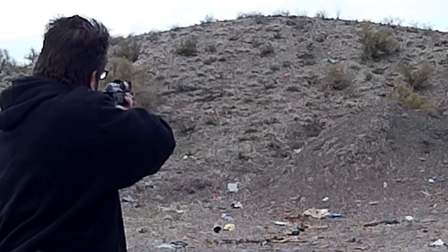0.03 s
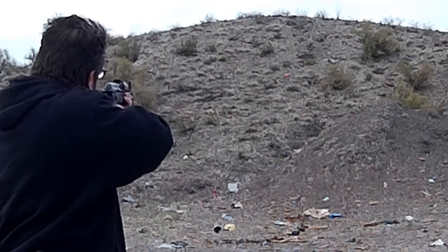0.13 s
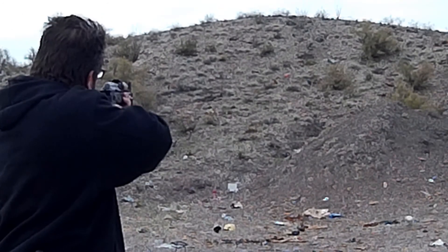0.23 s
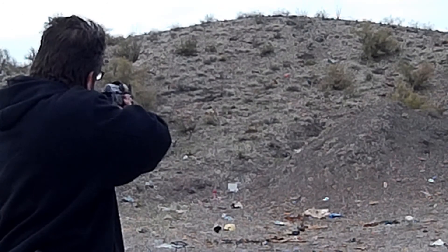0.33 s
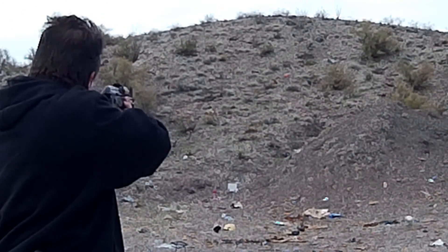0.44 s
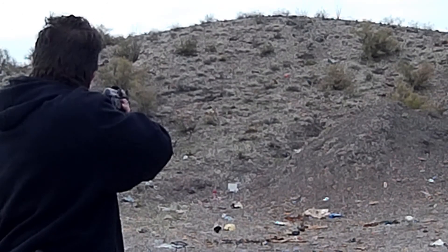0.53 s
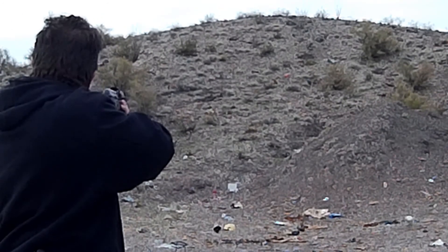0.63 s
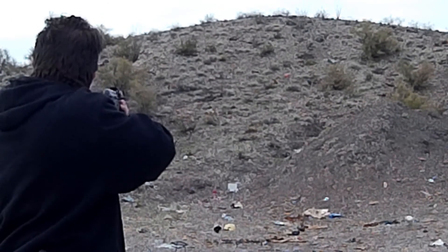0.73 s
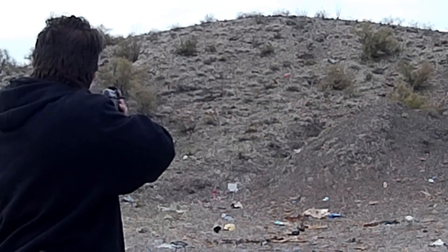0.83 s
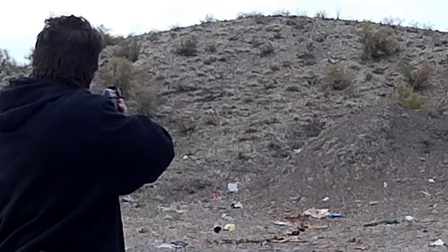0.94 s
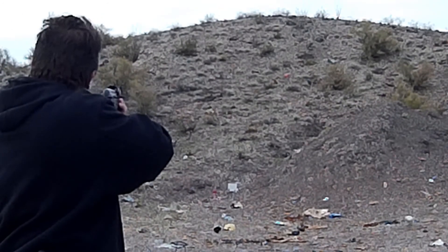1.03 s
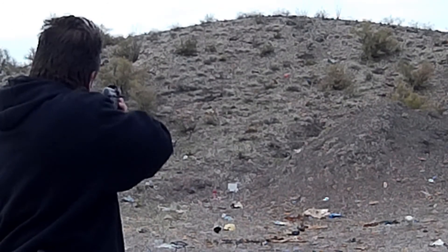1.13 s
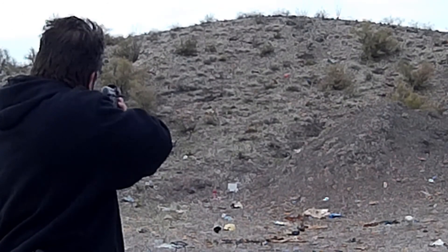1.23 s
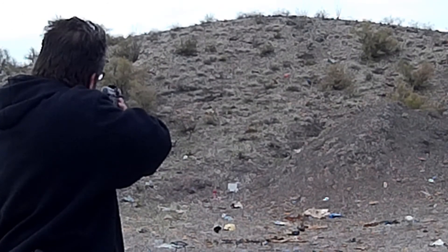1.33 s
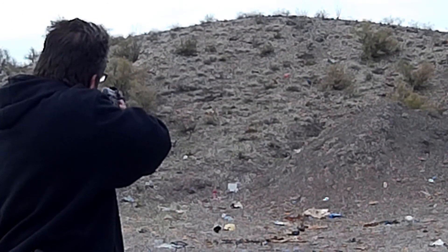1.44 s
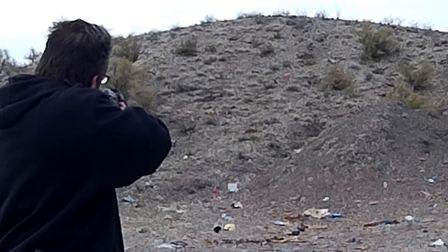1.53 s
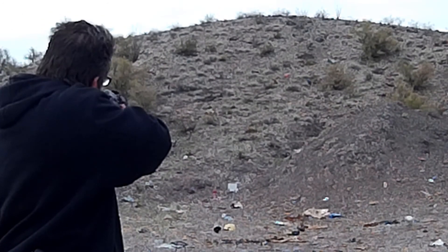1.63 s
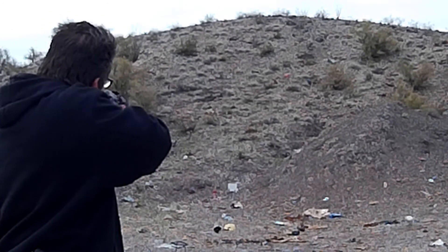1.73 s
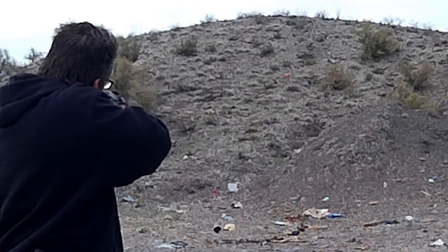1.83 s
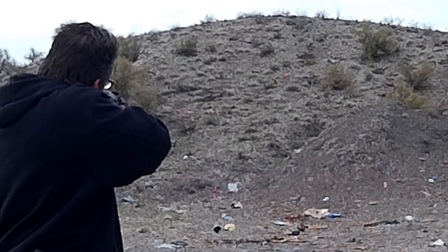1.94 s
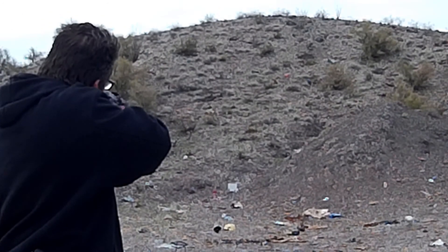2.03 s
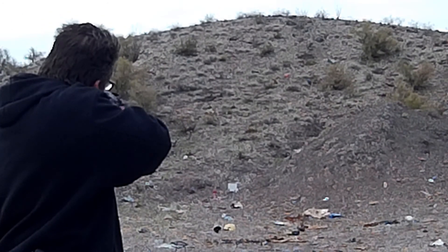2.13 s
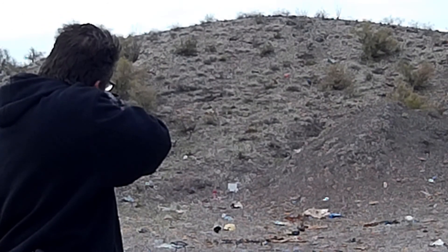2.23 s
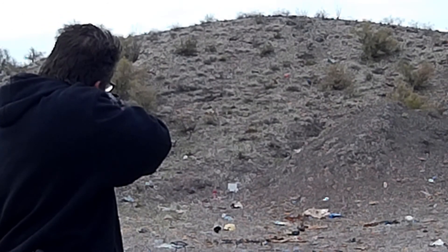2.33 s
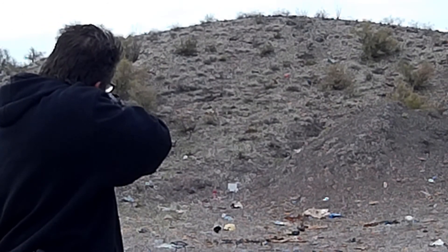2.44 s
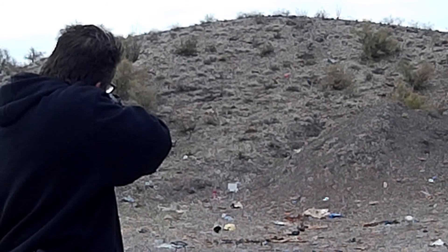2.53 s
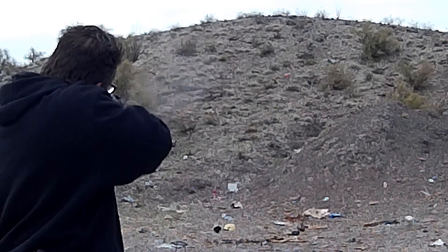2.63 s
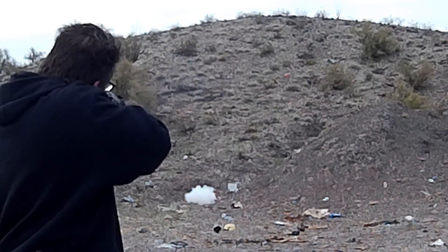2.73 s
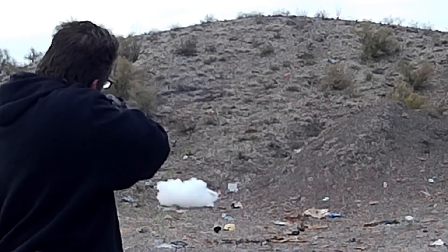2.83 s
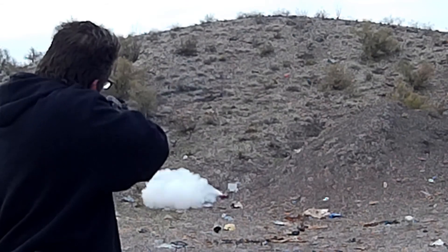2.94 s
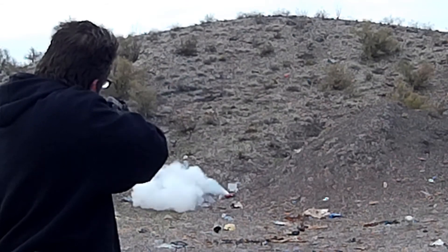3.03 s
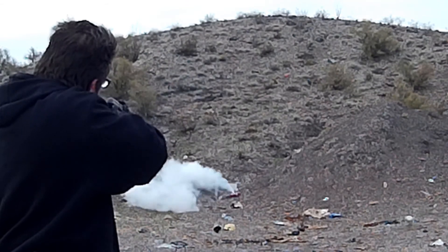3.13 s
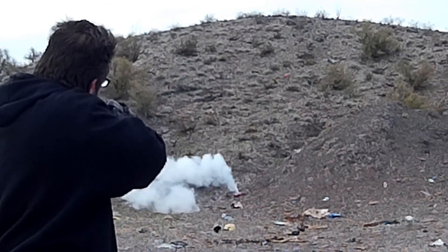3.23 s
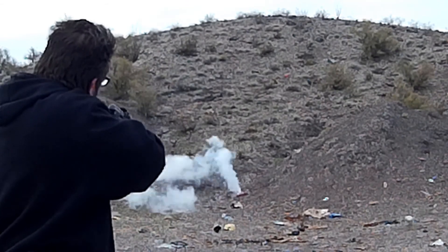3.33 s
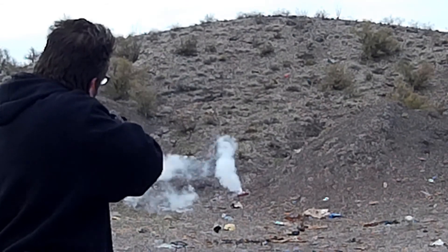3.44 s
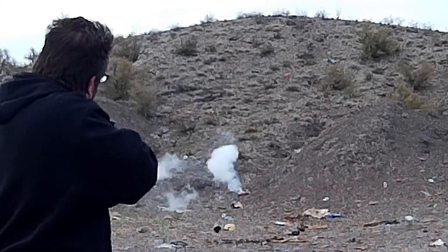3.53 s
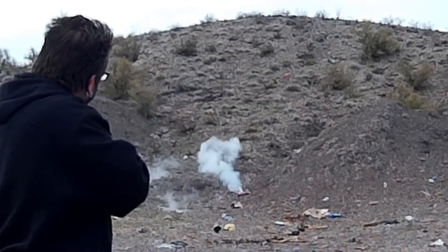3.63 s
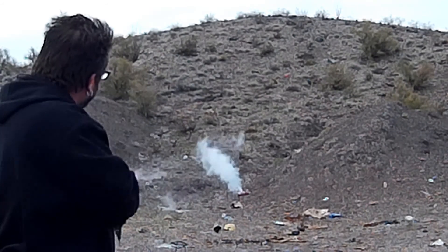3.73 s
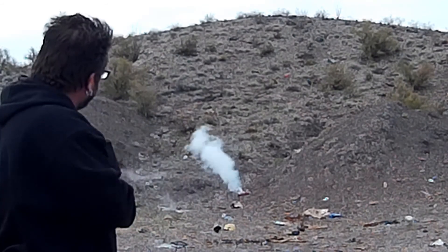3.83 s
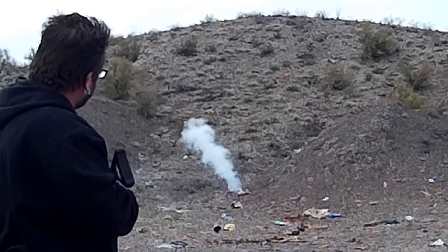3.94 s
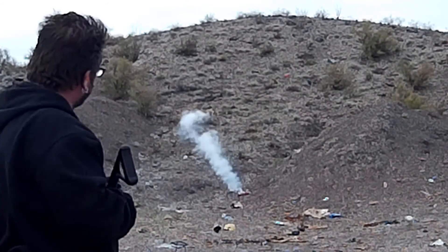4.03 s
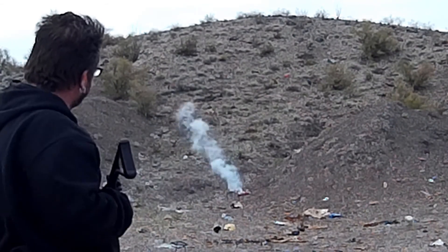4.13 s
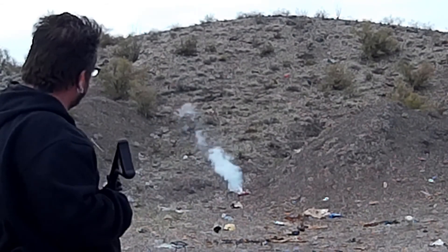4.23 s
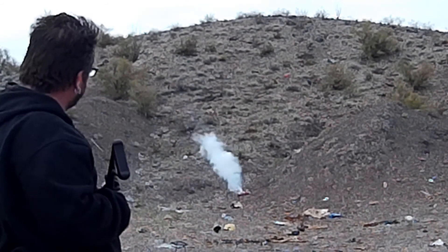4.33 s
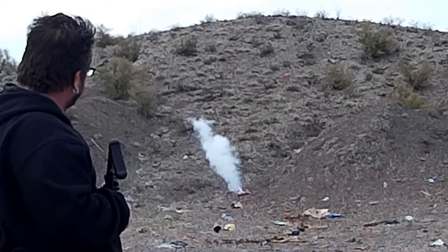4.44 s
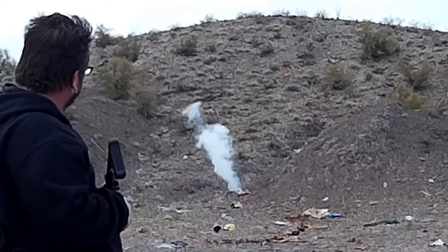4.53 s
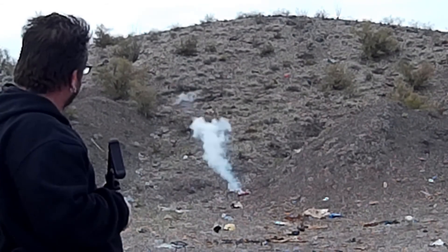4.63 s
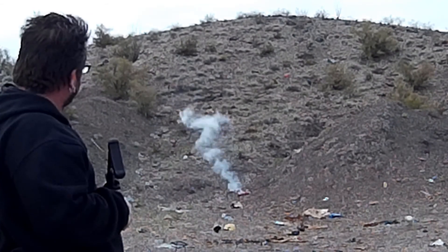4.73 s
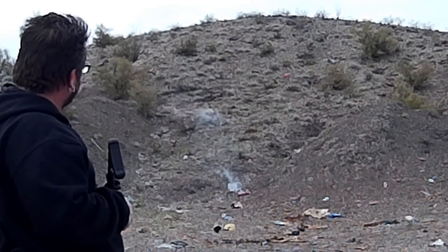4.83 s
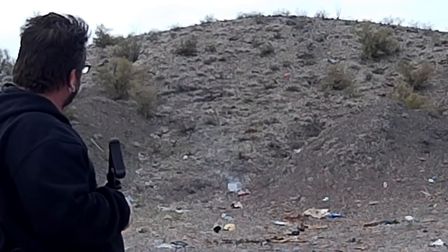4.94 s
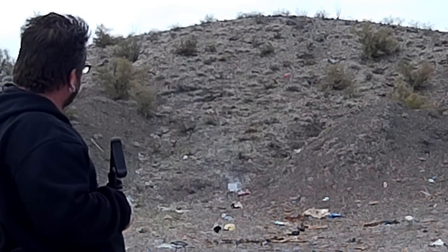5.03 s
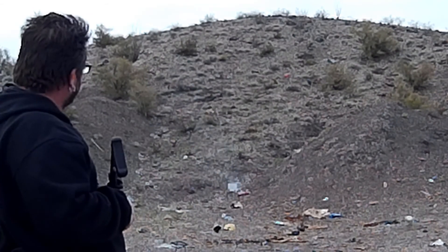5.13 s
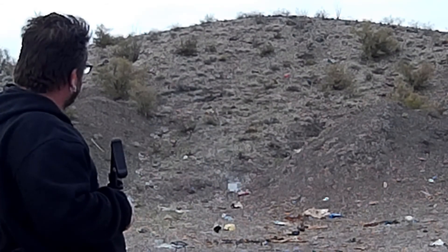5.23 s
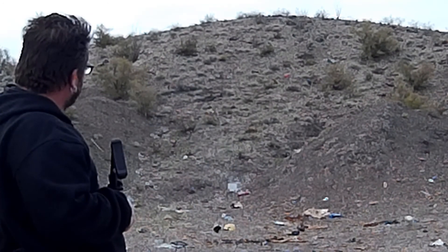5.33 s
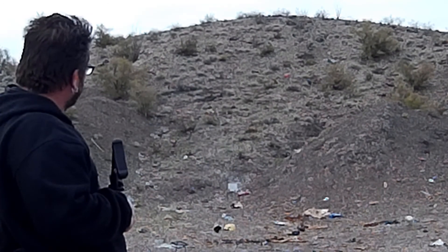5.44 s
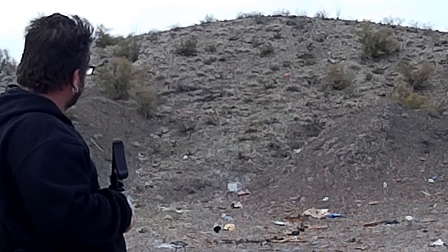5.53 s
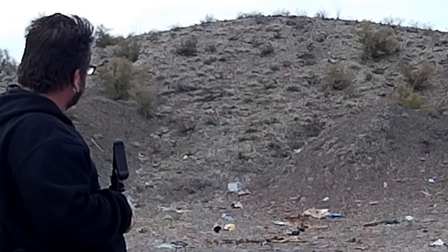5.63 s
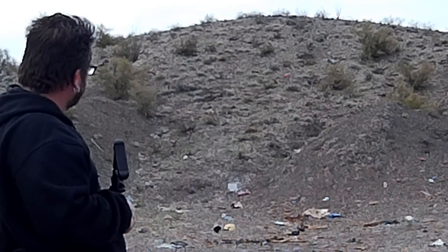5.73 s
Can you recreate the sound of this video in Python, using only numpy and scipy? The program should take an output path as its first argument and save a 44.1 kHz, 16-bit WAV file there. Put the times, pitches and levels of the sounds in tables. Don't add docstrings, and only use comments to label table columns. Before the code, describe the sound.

Open desert heard through a small mono camera microphone with steady electronic hiss, a very faint whine and low wind rumble. At 0.2 s a quiet, dulled distant shot pops and scatters off the hills. Tiny clicks of gear and cloth scuffs follow, busiest around 0.6 to 0.8 s with a wind bump, then sparse. A second muted shot comes at 2.15 s. At 2.67 s a very loud close rifle blast overloads the microphone with a low thump and dense roar. Sharp slaps on the struck can at 2.86 and 2.95 s, gravel scraping and soft hollow booms until 3.2 s. Gas swells into a strong, rough hiss by 3.3 s, becoming brighter and airier as the can swings upward. Loud far shots crack at 3.56 and 4.9 s, each momentarily dipping the hiss and echoing. Wind buffets grow near 5.1 s; the jet thins and weakens slightly, still hissing at the end.

```python
import sys
import numpy as np
from scipy import signal
from scipy.fft import rfft, irfft, next_fast_len
from scipy.io import wavfile
from scipy.ndimage import uniform_filter1d, map_coordinates

SR = 44100
rng = np.random.default_rng(int(sys.argv[2]) if len(sys.argv) > 2 else 0)


def volts_from_db(level):
    exponent = np.asarray(level, float) / 20
    return 10 ** exponent


def bounce(signal):
    frames = np.transpose(np.atleast_2d(signal))
    limited = np.clip(frames, -1, 1)
    pcm = np.round(limited * 32767).astype(np.int16)
    wavfile.write(sys.argv[1], SR, pcm)


N = 254898
SLOW = np.arange(0, N / SR + .001, .0005)

# (time [s], swing peak [dB], swing pitch [Hz], swing length [s], sharp front [dB])
FAR_SHOTS = [
    (.18168, -13.5, 980, .0031, -15),
    (2.15425, -12.5, 950, .002, -15),
    (3.5573, 8, 1020, .0024, 6),
    (4.8998, 8, 980, .0025, 6),
]


def unit(x):
    return x / np.sqrt(np.mean(x ** 2) + 1e-20)


def along(points, hz):
    f, v = np.transpose(points)
    return np.interp(np.log(hz + 1), np.log(f + 1), v)


def curves(rows):
    s, *cols = np.transpose(rows)
    return [np.interp(np.arange(N) / SR, s, c) for c in cols]


def wobble(rate):
    knots = rng.standard_normal(int(N * rate / SR) + 4)
    return map_coordinates(knots, [np.arange(N) * rate / SR])


def filtered(x, response):
    m = next_fast_len(N + 8192)
    hz = np.fft.rfftfreq(m, 1 / SR)
    return irfft(rfft(x, m) * response(hz), m)[..., :N]


def patchy(depth_db, slow_db=0):
    z = signal.stft(rng.standard_normal(N), nperseg=512)[2]

    def field(bins, frames):
        across_pitch = uniform_filter1d(rng.standard_normal(z.shape), size=bins, axis=0)
        return unit(uniform_filter1d(across_pitch, size=frames, axis=1))

    gain_db = depth_db * field(bins=6, frames=12)
    if slow_db:
        gain_db = gain_db + slow_db * field(bins=9, frames=50)
    return signal.istft(z * volts_from_db(gain_db), nperseg=512)[1][:N]


def coloured(spectrum, depth_db):
    return unit(filtered(patchy(depth_db), lambda hz: volts_from_db(along(spectrum, hz))))


def add(track, s, sound):
    part = track[round(s * SR):][:len(sound)]
    part += sound[:len(part)]


def swell(s, db, rise, t60):
    late = SLOW - s
    return volts_from_db(2 * db) * np.where(late < 0, np.exp(-(late / rise) ** 2), volts_from_db(-120 * np.abs(late) / t60))


def spread(envelope):
    return np.interp(np.arange(N) / SR, SLOW, envelope)


def resonances(peaks, hz):
    return np.sqrt(sum(volts_from_db(2 * db) / (1 + (2 * (hz - c) / w) ** 2) ** 1.5 for c, w, db in peaks))


def jet():
    # (time [s], flow [dB], brightness [dB])
    jet_flow = [(2.74, -30.5, -9), (2.84, -29.5, -11.5), (2.885, -27.3, -2.5), (2.95, -29, 1),
                (3.03, -28.5, -1.5), (3.09, -27.5, -6.5), (3.18, -24, -4), (3.3, -22, 0), (3.47, -22, 1.5),
                (3.95, -22, 0), (4.12, -23.5, 2), (4.36, -23.5, 2), (4.55, -23, -1.5), (4.8, -21.6, -1.5),
                (5.0, -21.6, -4), (5.28, -23, 1.5), (5.62, -25, -0.5), (5.78, -24, -1.5)]
    # (time [s], position [0 low, 1 up, 2 high, 3 dry])
    turns = [
        (3.35, 0),
        (3.7, 1),
        (3.95, 1),
        (4.3, 2),
        (4.88, 2),
        (5.2, 3),
    ]
    # (frequency [Hz], width [Hz], level [dB])
    low_peaks = [(770, 1030, -1.5), (1700, 640, 0.5), (3020, 690, -5.3), (3950, 860, -7.8),
                 (5110, 610, -7.8), (6790, 830, -6.7), (8150, 1350, -10.0), (9490, 730, -15.4),
                 (10650, 730, -18.1), (11660, 880, -9.5), (13540, 1050, -24.2), (14560, 400, -22.2),
                 (15850, 250, -50.0)]
    # (frequency [Hz], width [Hz], level [dB])
    up_peaks = [(1050, 830, -4.3), (1550, 520, -0.5), (2870, 760, -4.8), (3790, 770, -7.1),
                (5190, 460, -4.8), (6610, 700, -6.0), (7890, 1080, -7.8), (9270, 750, -8.1),
                (11040, 820, -12.6), (11960, 910, -10.7), (13600, 640, -20.2), (14570, 460, -20.0),
                (14950, 250, -25.8)]
    # (frequency [Hz], width [Hz], level [dB])
    high_peaks = [(1300, 860, -1.9), (1680, 320, -1.2), (2900, 630, -3.7), (3830, 500, -5.7),
                  (5150, 460, -2.6), (6580, 820, -5.1), (7680, 1000, -4.6), (9180, 700, -6.3),
                  (11110, 850, -7.5), (12050, 610, -6.5), (13470, 760, -18.2), (14500, 580, -17.1),
                  (15850, 250, -50.0)]
    # (frequency [Hz], width [Hz], level [dB])
    dry_peaks = [(1320, 1120, -2.9), (1880, 600, -1.2), (3270, 650, -0.7), (4060, 1010, -9.5),
                 (5260, 750, -5.1), (6580, 890, -5.4), (7350, 710, -1.7), (8800, 820, -6.9),
                 (10960, 990, -9.8), (11920, 940, -9.7), (13230, 1240, -16.7), (14460, 610, -17.6),
                 (15850, 250, -50.0)]
    # (rush [dB], hiss [dB], fizz [dB])
    eddies = [
        (-2, -3, -8),
        (-0.66, -3, -8),
        (0.46, 0.17, -2.5),
        (1.35, 0.62, -6.5),
    ]
    brightens = (0.308, 0.954, 0.84)
    # (frequency [Hz], width [Hz], depth [dB])
    dips = [(5950, 260, -11), (4560, 120, -3), (2260, 150, -2.5)]
    duck = [-8, -7]
    recover_s = .16

    t = np.arange(N) / SR
    roar_db, bright_db = curves(jet_flow)
    for (s, *_), duck_db in zip(FAR_SHOTS[2:], duck):
        late = t - s
        roar_db = roar_db + duck_db * (late > 0) * np.exp(-np.abs(late) / recover_s)
    (turn,) = curves(turns)

    m = next_fast_len(N + 8192)
    hz = np.fft.rfftfreq(m, 1 / SR)
    notch = np.prod([1 - (1 - volts_from_db(db)) / (1 + (2 * (hz - c) / w) ** 2) for c, w, db in dips], axis=0)
    gas = notch * rfft(patchy(depth_db=.9, slow_db=1.2), m)
    edges = [850, 2300, 6000, 10000, 15700]
    below = [1 / (1 + (hz / edge) ** steep) for edge, steep in zip(edges, [8, 16, 30, 30, 40])]

    out = np.zeros(N)
    for k, peaks in enumerate([low_peaks, up_peaks, high_peaks, dry_peaks]):
        shaped = gas * resonances(peaks, hz)
        over_db = [db + share * bright_db for db, share in zip(eddies[k], brightens)]
        ranges = [volts_from_db(db) * unit(irfft(shaped * (hi - lo), m)[:N])
                  for lo, hi, db in zip(below, below[1:], [0] + over_db)]
        nearness = np.clip(1 - np.abs(turn - k), 0, 1)
        out += nearness * sum(ranges)
    start = np.clip((t - 2.7) / .05, 0, 1)
    return start * volts_from_db(roar_db - .3 + .6 * wobble(45)) * out


def near_shot():
    # (frequency [Hz], level [dB per Hz])
    blast = [(35, -49), (60, -25), (330, -21.5), (560, 0), (1080, -3), (1210, 2.5), (2200, 0), (3380, -6.5),
             (4570, -9), (5020, -10), (9190, -21), (11900, -14), (15700, -32.5)]
    # (time [s], swing peak [dB], swing pitch [Hz], time to fall 60 dB [s], crack [dB])
    slaps = [
        (2.86, -3, 2000, .008, -21),
        (2.8607, -3, 1600, .005, -22),
        (2.8612, -4, -800, .008, -22),
        (2.8612, -13, -300, .012, -40),
        (2.9465, -10, 1300, .01, -32),
        (2.9494, -1, 1400, .005, -19),
    ]
    peak_db, rise_db_per_ms, hold_ms, crack_db_per_ms = 8, 23, 2.02, 2.18
    roar_db, roar_db_per_ms = -5.5, 0.3683

    ms = 1000 * (np.arange(N) / SR - 2.6692)
    front_db = peak_db - crack_db_per_ms * np.maximum(ms - hold_ms, 0)
    falling_db = np.maximum(front_db, roar_db - roar_db_per_ms * ms)
    db = np.where(ms < 0, peak_db + rise_db_per_ms * ms, falling_db)
    out = volts_from_db(db + 1.2 * wobble(300)) * coloured(blast, depth_db=.6) * (db > -60)

    t = np.arange(SR // 10) / SR
    push = -volts_from_db(-10) * (1 - t / .003) * np.exp(-t / .003)
    thump = volts_from_db(7 - 60 * t / .018) * np.sin(2 * np.pi * 310 * t)
    add(out, 2.669, push + thump)
    for s, db, hz, t60, crack_db in slaps:
        swing = volts_from_db(db - 60 * t / t60) * np.sin(2 * np.pi * hz * t)
        crack = signal.lfilter([1, 0, -1], [1, -1.4, .6], rng.standard_normal(len(t)))
        add(out, s, swing + volts_from_db(crack_db - 60 * t / .007) * crack)
    return signal.sosfilt(signal.butter(1, 45, "high", fs=SR, output="sos"), out)


def tumble():
    # (time [s], peak [dB], pitch [Hz], swell length [s])
    booms = [
        (2.965, -29, 593.2, 0.0147),
        (3.08, -29, 504, 0.0146),
        (3.1, -25, 570, 0.011),
        (3.12, -26.5, 616, 0.013),
        (3.21, -20, 504, 0.0059),
    ]
    t = np.arange(N) / SR
    return sum(volts_from_db(db) * np.exp(-((t - s) / length) ** 2) * np.sin(2 * np.pi * hz * t)
               for s, db, hz, length in booms)


def far_shots():
    out, t = np.zeros(N), np.arange(SR // 20) / SR
    for s, db, hz, length, front_db in FAR_SHOTS:
        u = t / .0001
        front = u * (2 - u) * np.exp(1 - u)
        front += .35 * np.roll(front, round(.00038 * SR))
        fade = np.exp(-(t / length) ** 6) * np.clip(t / .0004, 0, 1)
        swings = -np.sin(2 * np.pi * hz * (t - .00027)) * fade
        crackle = volts_from_db(-13 - 60 * t / .012) * rng.standard_normal(len(t))
        add(out, s, volts_from_db(front_db) * (front + crackle) + volts_from_db(db) * swings)
    out = signal.lfilter(*signal.iirnotch(390, 2.5, SR), out)
    return signal.sosfilt(signal.butter(3, 6500, fs=SR, output="sos"), out)


def hills():
    # (frequency [Hz], level [dB per Hz])
    hill_colour = [(120, -64.5), (200, -20.5), (235, -12.5), (288, -24.5), (403, -22), (581, -3), (880, 1),
                   (1720, -2), (2010, -7.5), (3000, -5), (4060, -21), (5150, -17.5), (9000, -37),
                   (11700, -64), (19800, -120)]
    answers = [1, -1, 13, 15.5]
    # (delay [s], level [dB], rise [s], time to fall 60 dB [s], bright part over it [dB])
    ridges = [
        (.006, -32.5, 0.00175, 0.106, -7),
        (.04, -46.5, .012, 0.574, -3),
        (.12, -47.5, 0.0395, 0.6, -5),
        (.21, -56.5, 0.022, 0.38, -3),
        (.3, -60, 0.06, 2.18, -3.5),
        (.79, -66, 0.062, .25, -11),
    ]
    # (time [s], level [dB])
    scuffs = [(0, -65.5), (.134, -77), (.165, -74), (.635, -55.5), (.69, -58), (.86, -66), (1.123, -71.5),
              (1.35, -71.5), (1.42, -69.5), (1.47, -68.5), (1.579, -70), (1.861, -74), (2.073, -67)]
    scuff_rise_s, scuff_t60, scuff_bright_db = 0.013, 0.197, -2.5

    parts = [(s + delay, db + answer_db, rise, t60, bright_db)
             for (s, *_), answer_db in zip(FAR_SHOTS, answers)
             for delay, db, rise, t60, bright_db in ridges]
    parts += [(s, db, scuff_rise_s, scuff_t60, scuff_bright_db) for s, db in scuffs]
    swells = np.array([swell(*part[:4]) for part in parts])
    dull_power = spread(swells.sum(axis=0))
    bright_power = spread(volts_from_db(2 * np.array(parts)[:, 4]) @ swells)
    wash = volts_from_db(1.3 * wobble(150) + 1.5 * wobble(35)) * coloured(hill_colour, depth_db=.8)
    dull = filtered(wash, lambda hz: 1 / (1 + (hz / 1500) ** 8))
    return np.sqrt(dull_power) * unit(dull) + np.sqrt(bright_power) * unit(wash - dull)


def air():
    # (time [s], level [dB], time to
    # fall 10 dB [s])
    gusts = [(0, -55.5, 0.07), (.11, -61, 0.08), (.22, -56.5, 0.1569), (.44, -63, 0.21),
             (.64, -51.5, 0.0536), (.7, -45.5, 0.0612), (.92, -69.5, 0.15), (1.1, -63, 0.02),
             (1.2, -71.5, 0.58), (1.64, -70.5, 0.36), (1.82, -68, 0.15), (2.2, -55.5, 0.0347),
             (2.35, -62, 0.0645), (2.54, -63, 0.12), (2.63, -64, 0.03), (2.73, -44, 0.0439),
             (2.89, -44.5, 0.0547), (2.96, -41.5, 0.0617), (3.15, -47, 0.192), (3.4, -46, 0.1425),
             (3.62, -49.5, 0.013), (3.95, -48, 0.3255), (4.25, -42, .17), (4.48, -41, 0.1415),
             (4.761, -40, .13), (5.0, -39.5, 0.0581), (5.11, -33, 0.0422), (5.18, -35.5, 0.0462),
             (5.48, -43, 0.106), (5.74, -36, .05)]
    # (frequency [Hz], level [dB per Hz])
    buffet_colour = [(12, -43.5), (20, -15), (75, -7.5), (112, -3.5), (140, -3), (173, -1.5), (330, -5.5),
                     (430, -37), (730, -120)]
    # (frequency [Hz], level [dB per Hz])
    rustle_colour = [(150, -60), (300, -13), (420, -2), (550, 0), (700, -3), (880, -12), (1300, -40),
                     (2500, -120)]
    # (frequency [Hz], level [dB per Hz])
    rumble_colour = [(12, -31.5), (20, 4), (48, 8.5), (110, 3.5), (218, -11.5), (274, -10.5), (307, -19.5),
                     (381, -15), (600, -23), (780, -57.5), (1320, -120)]
    # (time [s], level [dB])
    gravel = [
        (2.7, -67.5),
        (2.74, -34.5),
        (2.84, -38),
        (2.89, -30.5),
        (2.97, -38.5),
        (3.02, -32),
        (3.21, -32.5),
        (3.5, -43.5),
        (4.1, -50.5),
    ]
    # (time [s], share [0 to 1])
    settling = [
        (3.45, 0),
        (3.7, 1),
    ]
    hollow_s, hollow_db, hollow_rise_s, hollow_t60 = .15, -54.5, .06, 0.75
    cloth_db, dull_cloth_db = -9.5, -3

    t = np.arange(N) / SR
    gust_power = sum(volts_from_db(2 * (db - 10 * np.abs(SLOW - s) / fall)) for s, db, fall in gusts)
    gust = spread(np.sqrt(gust_power))
    (settled,), (gravel_db,) = curves(settling), curves(gravel)
    hollow = spread(sum(swell(s + hollow_s, hollow_db, hollow_rise_s, hollow_t60) for s, *_ in FAR_SHOTS[:2]))
    cloth = gust * volts_from_db(cloth_db + (dull_cloth_db - cloth_db) * settled)
    stir = np.sqrt(cloth ** 2 + hollow + volts_from_db(2 * gravel_db) * (t > gravel[0][0]))

    buffet = volts_from_db(1.5 * wobble(30)) * coloured(buffet_colour, depth_db=1)
    rustle = volts_from_db(2 * wobble(40)) * coloured(rustle_colour, depth_db=1.5)
    dull = unit(filtered(rustle, lambda hz: 1 / (1 + (hz / 430) ** 4)))
    rustle = (1 - settled) * rustle + settled * dull
    rumble = volts_from_db(-67.5) * coloured(rumble_colour, depth_db=.5)
    return gust * buffet + stir * rustle + rumble


def ticks():
    # (time [s], peak [dB], pitch [Hz])
    contacts = [(0.0894, -60, 2490), (0.1666, -42.5, 1700), (0.2274, -31.5, 1580), (0.2404, -32.5, 1660),
                (0.5851, -40.5, 1610), (0.5934, -47, 1660), (0.6094, -46, 2420), (0.6254, -46, 1700),
                (0.636, -31.5, 1640), (0.6414, -39.5, 1600), (0.685, -34.5, 1680), (0.7564, -34.5, 2530),
                (0.8324, -51, 1560), (1.1143, -41, 2684), (1.3094, -49, 1560), (1.3588, -47.5, 1955),
                (1.4154, -41, 1930), (1.46, -45.5, 1400), (1.578, -37, 1466), (2.073, -39.5, 2837),
                (2.0934, -52, 2750)]
    out, t = np.zeros(N), np.arange(SR // 20) / SR
    for s, db, hz in contacts:
        ring_and_crack = np.sin(2 * np.pi * hz * t) + 0.53 * rng.standard_normal(len(t))
        add(out, s, volts_from_db(db - 14 - 60 * t / .0125) * ring_and_crack)
    return out


def preamp():
    # (frequency [Hz], level [dB per Hz])
    hiss_colour = [(180, -44), (300, -24), (378, -6), (411, -9.5), (527, -10), (1250, -15), (1980, -16.5),
                   (3260, -17.5), (3720, -18), (9560, -19.5), (15700, -19.5)]
    # (frequency [Hz], width [Hz], level over the hiss [dB])
    whine_tone = (9520, 130, -12.5)
    hiss_db, pump_db, pump_s = -72.5, 4, 0.186
    since = [np.maximum(np.arange(N) / SR - s, 0) / pump_s for s, *_ in FAR_SHOTS[:2]]
    db = hiss_db + pump_db * sum(u * np.exp(1 - u) for u in since)
    hz, width, over_db = whine_tone
    whine = unit(filtered(rng.standard_normal(N), lambda f: 1 / (1 + (2 * (f - hz) / width) ** 2)))
    return volts_from_db(db + 4.5) * (coloured(hiss_colour, depth_db=.5) + volts_from_db(over_db) * whine)


def scene():
    mono = jet() + near_shot() + tumble() + far_shots() + hills() + air() + ticks() + preamp()
    return np.array([mono, mono])


def band_limit(x):
    return signal.sosfilt(signal.butter(12, 15860, fs=SR, output="sos"), x)


def record(dry):
    clipped = dry[0] / (1 + np.abs(dry[0] / .985) ** 16) ** (1 / 16)
    limited = filtered(clipped, lambda hz: np.clip((15830 - hz) / 120, 0, 1))
    return band_limit(np.array([limited, limited]))


dry = scene()
out = record(dry)
bounce(out)
```